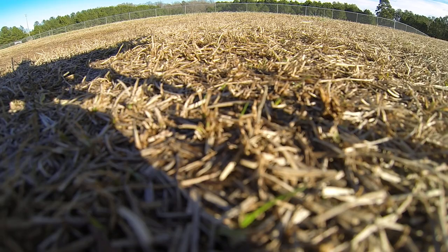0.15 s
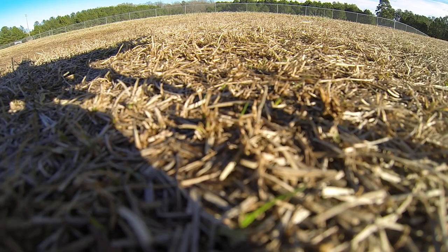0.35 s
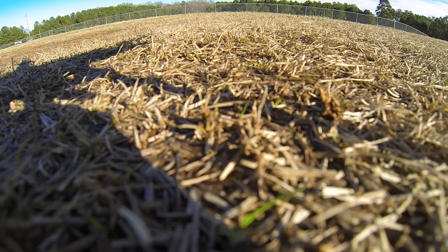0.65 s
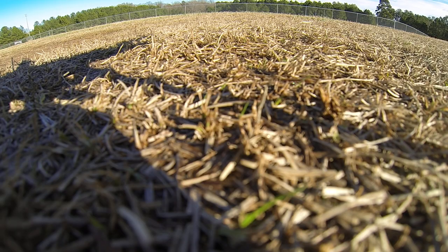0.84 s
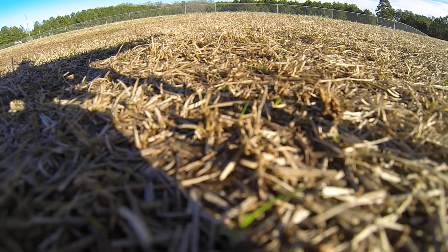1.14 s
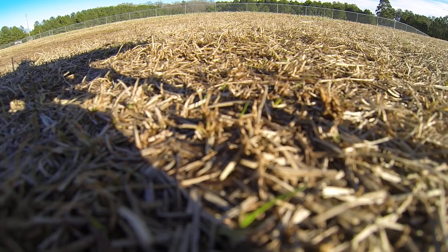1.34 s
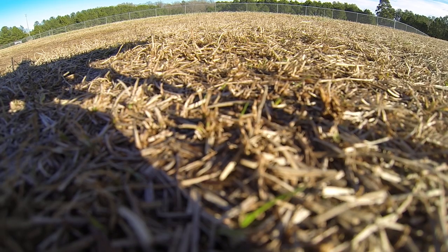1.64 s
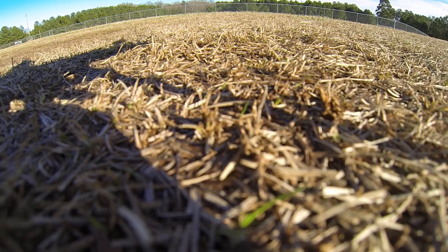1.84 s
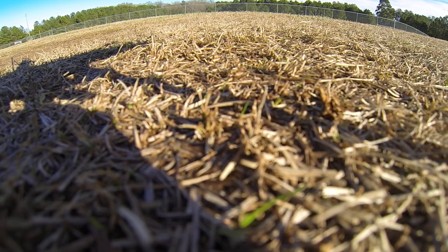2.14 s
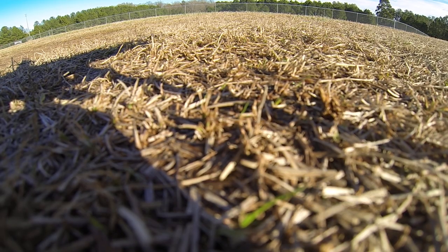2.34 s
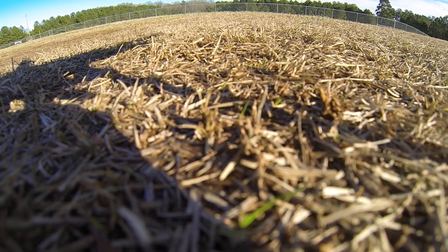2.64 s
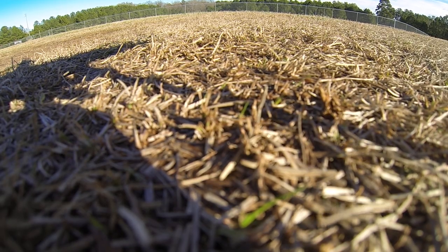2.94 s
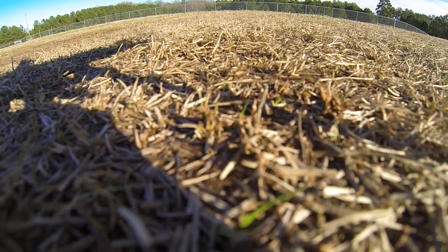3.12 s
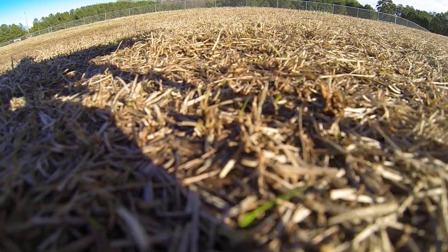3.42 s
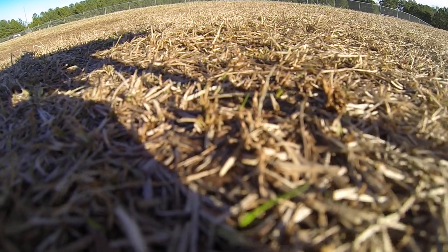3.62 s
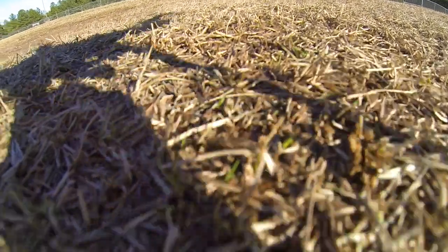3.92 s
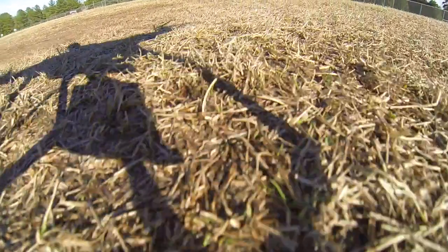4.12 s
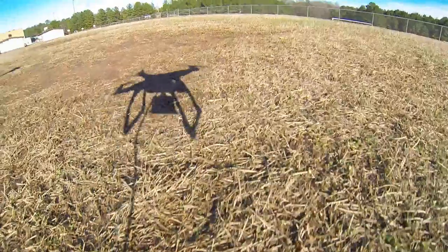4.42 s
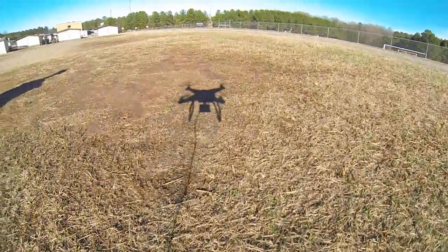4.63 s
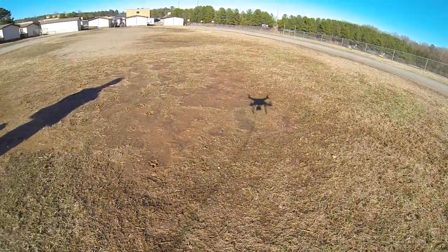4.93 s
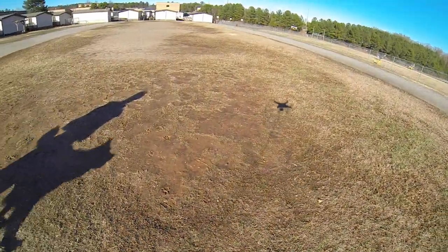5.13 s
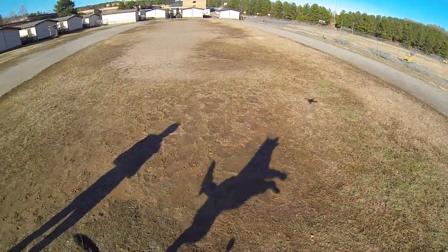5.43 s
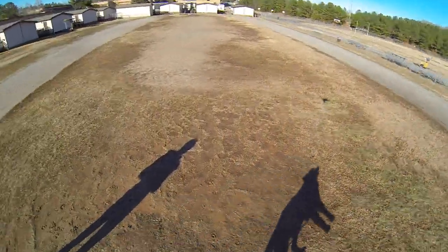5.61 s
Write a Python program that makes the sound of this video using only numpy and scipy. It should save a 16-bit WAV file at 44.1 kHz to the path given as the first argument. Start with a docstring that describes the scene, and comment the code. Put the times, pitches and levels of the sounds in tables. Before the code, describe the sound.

Outdoors over dry stubble, about a second of faint air and one tiny dry tick. A quadcopter then jolts awake with a growing rattle, settles into a whirring idle with a high electronic whine, and spins up. Wind wash roars and thuds against the microphone mounted on its frame, worst around lift-off, then eases into a loud, high propeller buzz as it climbs, with a bright click or two.

```python
"""Quiet open air over a stubble field with one faint dry tick; then a quadcopter close by jolts awake and rattles.
Its four motors idle briefly, spin up and lift it off, with the microphone riding on the frame at no distance.
Tones tied to each motor's turns make the propeller buzz and magnet hum, ringing through the frame's modes;
the speed controllers whine near 8 kHz. Coloured noise makes rasp, fizz, hiss and the wash that buffets the
microphone port, hardest around lift-off, then easing in the climb; the recorder's limiter ducks under it."""
import sys
import numpy as np
from scipy import signal
from scipy.fft import rfft, irfft, next_fast_len
from scipy.io import wavfile

SR = 44100
rng = np.random.default_rng(int(sys.argv[2]) if len(sys.argv) > 2 else 0)


def bounce(signal):
    """Save signal as a 16-bit WAV file at the path given by the first command-line argument."""
    frames = np.transpose(np.atleast_2d(signal))
    limited = np.clip(frames, -1, 1)
    pcm = np.round(limited * 32767).astype(np.int16)
    wavfile.write(sys.argv[1], SR, pcm)


N = 254280
T = np.arange(N) / SR  # seconds

# Open air: spectrum outlines, used for their shape only: pitch_hz, density_db (per Hz)
FIELD_SPECTRUM = [(20, 5.5), (60, 3.5), (150, -12), (300, -15.5), (800, -14), (1400, -20.5), (2500, -32),
                  (5000, -37.5), (15000, -47.5)]
TICK_SPECTRUM = [(300, 15), (1500, 7), (4000, -4), (7000, -24), (15000, -20)]
# Dry ticks, one faint before power-on, two bright clicks during the flight: start_s, peak_db
TICKS = [(0.521, -45.5), (4.558, -9), (5.591, -19)]
FIELD_DB, BREEZE_DB = -48, -51

# Propeller wash on the port, strongest around lift-off, then easing: time_s, level_db
WASH_LEVEL = [(1.1, -46.5), (1.45, -29), (2.05, -32), (2.2, -21.5), (2.33, -12.5), (2.55, -14.5),
              (3.0, -12), (3.45, -10), (3.6, -8), (3.85, -10), (3.97, -4), (4.24, -7), (4.35, -24),
              (4.41, -11), (4.52, -8.5), (4.6, -22), (4.72, -17.5), (5.77, -21)]
# Gusts that press on the port: start_s, peak_db
GUSTS = [(2.417, -7.5), (2.655, -5), (2.967, -9), (3.235, -4), (3.426, 3.5), (3.802, 8.5), (4.235, -2.5),
         (4.434, -4), (4.524, 4.5), (5.061, -0.5), (5.27, -21)]
# Strong eddies hitting the port: start_s, peak_db (relative), treble_db (relative to the peak)
EDDIES = [(2.324, -0.5, -19), (2.644, 7.5, -31), (2.69, 3, -12.5), (2.736, 2.5, -15), (2.774, 6.5, -35),
          (3.025, 8, -26), (3.231, 10, -34), (3.338, 8.5, -25), (3.507, -1, -27), (3.57, 8, -7.5),
          (3.633, -12, -26), (3.733, 8.5, -12.5), (3.797, 5.5, -11), (3.897, 13, -12.5), (3.961, 8, -7),
          (3.995, 6, -10), (4.042, 5.5, -4), (4.108, 10.5, -4), (4.144, -4, 7), (4.167, 6.5, -0.5),
          (4.433, 0.5, -4.5), (4.519, 3.5, -4)]
# Moving air, from deep to sharp: pitch_hz, density_db (per Hz)
RUMBLE_SPECTRUM = [(10, 5.5), (25, -7.5), (55, 3.5), (100, -3.5), (170, -12.5), (300, -37.5), (600, -43.5)]
FLUTTER_SPECTRUM = [(50, -7.5), (130, 3), (250, -1.5), (420, -7), (700, -15), (1200, -35), (2500, -58)]
TEARING_SPECTRUM = [(300, 3), (650, 3.5), (1000, 0.5), (1600, -5), (2600, -15.5), (4000, -20),
                    (8000, -42.5)]
CLEAR_OF_GROUND_S, CLEARING_S = 4.4, 0.31  # the wash stops bouncing back off the field

# Power-on, then the motors are stepped blindly until the controllers lock on
POWER_ON_S, STEPPING_S, LOCKED_S = 1.076, 1.1, 1.365
# Noise of the drone: pitch_hz, density_db (per Hz)
STUTTER_SPECTRUM = [(260, -46), (450, -12), (586, -15), (650, -12), (729, 1), (928, -36), (1360, -9),
                    (1500, -13.5), (1830, -13), (2270, -26.5), (3030, -13), (3430, -14.5), (3770, -29),
                    (4680, -23), (7000, -32), (9100, -69), (15400, -120)]
RASP_SPECTRUM = [(1290, -38), (2200, -53), (2470, -3), (2780, -2), (3220, 3.5), (3420, 1.5), (3820, -26),
                 (4320, -4.5), (4630, 7.5), (4870, 7.5), (5220, 2.5), (5480, -2), (7200, -18.5),
                 (9360, -44), (15800, -120)]
FIZZ_SPECTRUM = [(5500, -14), (7300, -5), (8100, 6), (9000, 6), (10500, -8), (13000, -14), (15000, -18)]
HISS_SPECTRUM = [(1200, 2), (2000, -5), (2500, -4), (3000, -10), (3700, -9.5), (4300, -4), (5100, -24),
                 (5800, -12.5), (7300, -14.5), (8100, -8), (9000, -16), (10500, -18), (15000, -23)]

# Start, idle, spin-up, climb: time_s, mean speed of the rotors (turns per s)
THROTTLE = [(1.12, 1), (1.33, 21.3), (1.4, 22.9), (1.6, 21.2), (2.07, 20.1), (2.15, 28.7), (2.27, 35.4),
            (2.55, 41.7), (4, 87.6), (4.4, 95.7), (4.8, 99.5), (4.9, 102.7), (5.04, 104), (5.3, 104.3),
            (5.37, 106.5), (5.52, 103.5), (5.62, 96), (5.77, 92)]
# Steering: time_s, speed of motors 1, 2, 3, 4 (share of the mean)
TRIM = [(1.4, 1.03, 1.013, .987, .974), (1.8, 1.087, 1.024, .976, .917), (2.35, 1.11, 1.014, .95, .93),
        (3, 1.063, 1.01, .977, .948), (3.7, 1.048, 1.016, .96, .97), (4.8, 1.035, 1.013, .992, .962),
        (5.04, 1.048, 1.033, 1.003, .925), (5.29, 1.037, 1.025, .988, .968), (5.5, 1.058, 1.035, .99, .89),
        (5.66, .98, .99, 1.09, .915)]
# Current drawn by the motors, low while they idle: time_s, effort_db
EFFORT = [(1.08, -2), (1.12, -7), (1.3, 1.5), (1.35, 1.5), (1.41, -7), (2.06, -7), (2.085, 4.5), (2.4, 7.5)]
FLIGHT_TURNS_PER_S, IDLE_TURNS_PER_S = 100, 20
# How each sound grows: flight_db (at flight speed, effort 0), growth_db (per tenfold speed), effort_share
BUZZ_LAW = (-19.5, 19.5, 0.055)
MAGNET_LAW = (-31, 0.5, 0.034)
STEP_LAW = (-24, 17.8, 0.27)
BELL_LAW = (-37, 17, .3)
WHINE_LAW = (-45, -20, 0.87)
BEAT_LAW = (-50.5, -2, 0.33)
RASP_LAW = (-45, -11.5, 1.08)
FIZZ_LAW = (-59.5, -16, 0.77)
HISS_LAW = (-38, 4.6, 0.98)
CHURN_LAW = (-37.5, 4.9, 0.12)

# Pressure wave of a propeller: multiple (of the turn rate), level_db
BLADES = [(2, -1), (4, -8), (6, -8.5), (8, -13), (10, -15.5), (12, -18.5), (16, -23.5), (24, -30.5),
          (44, -55)]
# Frame shaken by unbalanced propellers: time_s, level_db
SHAKE_LEVEL = [(1.08, -80), (2.1, -73), (4.6, -33), (4.95, -26), (5.12, -8), (5.35, -14), (5.48, -22.5),
               (5.77, -20.5)]
# Magnetic and cogging tones of a motor: multiple (of the turn rate), level_db
MAGNETS = [(14, -3.5), (24, -10), (28, -9), (36, -1), (42, 0), (44, -14.5), (48, -4.5), (54, -6.5),
           (66, -13), (72, -27), (112, -37), (126, -29), (168, -17)]
# Tones the motor bells radiate into the air: multiple (of the turn rate), level_db of motors 1, 2, 3, 4
BELLS = [(24, -12, -14, 7, -18), (42, -10, -14, 5.5, 1.5), (48, -17, -20, 1, -22)]
# How well the bells radiate: pitch_hz, level_db
BELL_COLOUR = [(1000, -6.5), (2250, -2), (2470, -1), (2700, -15), (3100, -3), (3750, -18), (4080, 0.5),
               (4500, -14), (4950, -7), (5500, -16)]
# Switching tones of the speed controllers: pitch_hz, level_db
CARRIERS = [(8089, 0), (8079, -5), (8045, -3), (8012, -3.5)]
# Current ripple beating with the switching tone: multiple (of the turn rate), level_db
BEATS = [(56, 8), (84, -1)]
# Resonances of the arms and shell: pitch_hz, width_hz, level_db
FRAME_MODES = [(677.4, 52, 12), (774.5, 27, 17.5), (970, 540, 1.5), (1396, 92, -5), (1694, 320, 1.5),
               (2446, 17, -1.5), (2950, 260, -3.5), (3317, 100, -1), (4176, 71, 1), (4640, 340, -19),
               (4654, 24, -5), (5200, 80, -2), (6620, 130, 2)]
BELL_STEPS_DB = -5  # current steps heard straight from the bells
COGGING_DB, COGGING_MODE_HZ, COGGING_WIDTH_HZ = -29, 760, 53  # lowest mode of an arm
STEPS_FADE_TURNS_PER_S = 43
WHINE_FADE_TURNS_PER_S = 95  # near full throttle the controllers hardly switch

LIMIT_DB, RELEASE_DB_PER_S, DETECTOR_S = -12, 65, 0.045  # the recorder's limiter
CUTOFF_HZ = 15300


def from_db(db):
    """Decibels to gain."""
    return 10 ** (np.asarray(db) / 20)


def rms_one(x):
    """Scale to unit power."""
    return x / np.sqrt(np.mean(x ** 2) + 1e-20)


def in_time(rows):
    """Each column of a curve at every sample."""
    s, *columns = np.transpose(rows)
    return [np.interp(T, s, c) for c in columns]


def at_level(x, curve):
    """Play a steady sound along a level curve."""
    return rms_one(x) * from_db(in_time(curve)[0])


def colour(x, spectrum):
    """Filter by a spectrum outline that falls away steeply above its last point."""
    hz, db = np.transpose(spectrum)
    size = next_fast_len(N + SR // 4)
    bins = np.maximum(np.arange(size // 2 + 1) * SR / size, 1)
    outline = from_db(np.interp(np.log(bins), np.log(hz), db))
    gain = outline * np.minimum(1, hz[-1] / bins) ** 2
    return irfft(rfft(x, size) * gain, size)[:N]


def noise(spectrum):
    """Coloured noise of unit power."""
    return rms_one(colour(rng.standard_normal(N), spectrum))


def crackle(spectrum, per_s=700):
    """Sharp pressure spikes of uneven size over a little smooth noise; unit power."""
    spikes = (rng.random(N) < per_s / SR) * np.clip(rng.standard_normal(N), -2, 2)
    return rms_one(colour(spikes + 0.05 * rng.standard_normal(N), spectrum))


def drift(rate):
    """Slow random wandering of spread 1, from noise smoothed by two poles at rate (Hz)."""
    step = 40  # samples between the slow values
    r = np.exp(-2 * np.pi * rate * step / SR)
    draws = rng.standard_normal(N // step + 2002)
    slow = signal.lfilter([1], [1, -2 * r, r * r], draws)[2000:]  # settled part
    return np.interp(np.arange(N) / step, np.arange(len(slow)), rms_one(slow))


def waver(rate, depth_db):
    """A randomly wandering gain of unit power."""
    return rms_one(from_db(depth_db * np.clip(drift(rate), -2, 2)))


def smooth(x, seconds):
    """One-pole average."""
    r = np.exp(-1 / (seconds * SR))
    return signal.lfilter([1 - r], [1, -r], x)


def resonance(x, hz, width_hz):
    """One mode, with gain 1 at its top."""
    r = np.exp(-np.pi * width_hz / SR)
    top = np.array([1, 0, -1]) * (1 - r * r) / 2
    return signal.lfilter(top, [1, -2 * r * np.cos(2 * np.pi * hz / SR), r * r], x)


def follow(law):
    """Gain of a drone sound, from speed and effort."""
    flight_db, growth_db, effort_share = law
    speed = np.maximum(in_time(THROTTLE)[0], IDLE_TURNS_PER_S)
    speed_db = growth_db * np.log10(speed / FLIGHT_TURNS_PER_S)
    return from_db(flight_db + speed_db + effort_share * in_time(EFFORT)[0])


def fade_above(speed, corner, order=6):
    """Gain that falls away once the speed passes a corner."""
    return 1 / np.sqrt(1 + (speed / corner) ** (2 * order))


def start_up():
    """Gain that rises with the square of the speed up to idle."""
    return np.minimum(in_time(THROTTLE)[0] / IDLE_TURNS_PER_S, 1) ** 2


def field(tick_decay_s=0.0046):
    """Quiet open air, a light breeze on the port and three dry, fast-dying ticks."""
    ticks = sum(from_db(db) * (T > s) * np.exp(-np.abs(T - s) / tick_decay_s) for s, db in TICKS)
    breeze = from_db(BREEZE_DB) * noise(RUMBLE_SPECTRUM) * waver(rate=12, depth_db=-1.5)
    air = from_db(FIELD_DB) * noise(FIELD_SPECTRUM) * waver(rate=3.1, depth_db=1.5)
    return air + breeze + ticks * noise(TICK_SPECTRUM)


def wash(flutter_db=-0.5, flutter_growth=1.07, tearing_db=-4, tearing_growth=1.776, airborne_db=-5):
    """Turbulent air on the port: brighter and lumpier the harder it blows, less fluttery off the ground."""
    level_db, = in_time(WASH_LEVEL)
    airborne = np.clip((T - CLEAR_OF_GROUND_S) / CLEARING_S, 0, 1)
    lumps = waver(rate=82, depth_db=2.5)
    rumble = from_db(level_db) * noise(RUMBLE_SPECTRUM) * waver(rate=21, depth_db=1.4)
    flutter_level_db = flutter_growth * level_db + flutter_db + airborne_db * airborne
    flutter = from_db(flutter_level_db) * noise(FLUTTER_SPECTRUM)
    tearing = from_db(tearing_growth * level_db + tearing_db) * crackle(TEARING_SPECTRUM)
    return rumble + lumps * (flutter + tearing)


def gusts(rise_s=0.0096, rough=0.36):
    """Each gust is one slow, slightly ragged push of pressure on the port."""
    push = 0
    for s, peak_db in GUSTS:
        age = np.clip((T - s) / rise_s, 0, 40)
        push = push + from_db(peak_db) * age * np.exp(1 - age)
    return push * (1 + rough * noise(RUMBLE_SPECTRUM))


def eddies(rise_s=0.0024, thud_db=-9, tear_db=-8):
    """Each eddy is a short dull thud with a tearing edge."""
    thud, tear = np.zeros(N), np.zeros(N)
    age = np.arange(SR // 16) / SR / rise_s
    puff = age * np.exp(1 - age)
    for s, peak_db, treble_db in EDDIES:
        start = round(s * SR)
        at = slice(start, start + len(puff))
        thud[at] += from_db(peak_db + thud_db) * puff
        tear[at] += from_db(peak_db + treble_db + tear_db) * puff
    return thud * noise(FLUTTER_SPECTRUM) + tear * noise(TEARING_SPECTRUM)


def stutter(kicks_per_s=1100, ring_hz=738, ring_width_hz=40):
    """A power-on jolt, then growing irregular current kicks set the frame ringing until lock-on."""
    jolt_db, jolt_s = -30, 0.017
    stepping_db, growth_db_per_s, release_s = -31, 20, 0.0061
    jolt = from_db(jolt_db) * (T > POWER_ON_S) * np.exp(-np.abs(T - POWER_ON_S) / jolt_s)
    early, late = np.maximum(LOCKED_S - T, 0), np.maximum(T - LOCKED_S, 0)
    growth = from_db(stepping_db - growth_db_per_s * early)
    stepping = (T > STEPPING_S) * growth * np.exp(-late / release_s)
    kicks = (rng.random(N) < kicks_per_s / SR) * rng.standard_normal(N)
    rattle = rms_one(colour(kicks + 0.2 * rng.standard_normal(N), STUTTER_SPECTRUM))
    ring = rms_one(resonance(kicks, ring_hz, ring_width_hz))
    return (jolt + stepping) * (rattle + ring)


def rush():
    """The motors rasp in the frame, the controllers fizz, the blade tips hiss and churn the air."""
    rasp = follow(RASP_LAW) * noise(RASP_SPECTRUM) * waver(rate=38, depth_db=1.5)
    fizz = follow(FIZZ_LAW) * noise(FIZZ_SPECTRUM)
    hiss = follow(HISS_LAW) * noise(HISS_SPECTRUM) * waver(rate=190, depth_db=2.2)
    churn = follow(CHURN_LAW) * crackle(TEARING_SPECTRUM) * start_up()
    return (T > STEPPING_S) * (rasp + fizz + hiss + churn)


def per_turn(turns, orders, levels_db, size=8192):
    """A wave of unit power that repeats on every turn, made of the given multiples."""
    angle = np.arange(size + 1) / size
    phases = rng.random((len(orders), 1))
    partials = np.sin(2 * np.pi * (np.outer(np.round(orders), angle) + phases))
    shape = from_db(levels_db) @ partials
    return np.interp(turns % 1, angle, rms_one(shape))


def propeller(turns, odd_db=-15, count=44, sway_turns=0.006):
    """Two blades give even multiples, their mismatch weak odd ones; torn air varies each passage."""
    orders = np.arange(2, count)
    levels_db = np.interp(orders, *np.transpose(BLADES)) + odd_db * (orders % 2)
    sway = sway_turns * drift(35)
    return per_turn(turns + sway, orders, levels_db) * waver(rate=9.6, depth_db=4.0)


def motor(turns, comb_db=-9, count=130):
    """Magnets passing the stator give strong high multiples over a weak comb of the even ones."""
    magnets = per_turn(turns, *np.transpose(MAGNETS))
    orders = 2 * np.arange(16, count)
    uneven = per_turn(turns, orders, rng.normal(0, 4.3, len(orders)))
    return (magnets + from_db(comb_db) * uneven) * waver(rate=3, depth_db=4.0)


def bell(turns, levels_db):
    """One motor's outer bell radiates a few multiples of its turn rate straight into the air."""
    orders = np.round(np.transpose(BELLS)[0])
    tones = from_db(levels_db) @ np.sin(2 * np.pi * np.outer(orders, turns))
    return tones * waver(rate=5, depth_db=3)


def ripple(turns, carrier_hz):
    """Current ripple beats with the switching tone, giving tones that fall as the motor speeds up."""
    return sum(from_db(db) * np.sin(2 * np.pi * (carrier_hz * T - round(order) * turns))
               for order, db in BEATS)


def controller(turns, carrier_hz, sideband_db=-15, second_db=-32, skirt_db=-21):
    """The switching tone; 14 passing poles put side tones on it that fan out with speed."""
    poles = 2 * np.pi * 14 * turns
    sidebands = from_db(sideband_db) * np.cos(poles) + from_db(second_db) * np.cos(2 * poles)
    skirt = from_db(skirt_db) * drift(430)
    carrier = np.sin(2 * np.pi * (carrier_hz * T + rng.random()))
    return (1 + 2 * sidebands + 2 * skirt) * carrier


def frame(x):
    """Tones flare up as they glide through the modes of the frame, and all but vanish between them."""
    return sum(from_db(db) * resonance(resonance(x, hz, width), hz, width)
               for hz, width, db in FRAME_MODES)


def rotors():
    """Four motors at slightly different speeds beat against each other, through air and frame."""
    through_air, through_arm = from_db([7, 1, -1, 1.5]), from_db([-1, -3, 2.5, -2])
    throttle, = in_time(THROTTLE)
    bell_levels = np.transpose(BELLS)[1:]
    buzz = hum = cogging = steps = bells = beats = whine = shake = 0
    motors = zip(in_time(TRIM), CARRIERS, through_air, through_arm, bell_levels)
    for trim, (carrier_hz, carrier_db), air, arm, bell_db in motors:
        speed = throttle * trim
        turns = np.cumsum(speed * (1 + 0.0016 * drift(12))) / SR
        buzz = buzz + air * propeller(turns)
        shake = shake + air * np.sin(2 * np.pi * turns) * waver(rate=16, depth_db=4)
        hum = hum + arm * motor(turns)
        cogging = cogging + arm * np.sin(2 * np.pi * 36 * turns)
        # current steps, 84 a turn, smoothed out at speed
        step_tone = np.sin(2 * np.pi * 84 * turns)
        steps = steps + arm * step_tone * fade_above(speed, STEPS_FADE_TURNS_PER_S, order=12)
        bells = bells + bell(turns, bell_db)
        beats = beats + ripple(turns, carrier_hz)
        whine = whine + from_db(carrier_db) * controller(turns, carrier_hz)
    buzz = rms_one(buzz) * follow(BUZZ_LAW)
    steps = steps / np.sqrt(2) * follow(STEP_LAW)
    whine = rms_one(whine) * follow(WHINE_LAW) * fade_above(throttle, WHINE_FADE_TURNS_PER_S)
    bells = colour(rms_one(bells), BELL_COLOUR) * follow(BELL_LAW)
    radiated = from_db(BELL_STEPS_DB) * steps + bells
    hum = rms_one(hum) * follow(MAGNET_LAW)
    beats = rms_one(beats) * follow(BEAT_LAW)
    vibration = frame(hum + beats + steps)
    # around idle speed the cogging sweeps through the arm's mode
    arms = from_db(COGGING_DB) * resonance(rms_one(cogging), COGGING_MODE_HZ, COGGING_WIDTH_HZ)
    return start_up() * (buzz + vibration + arms + radiated) + at_level(shake, SHAKE_LEVEL) + whine


def scene():
    """The field, the air on the port, and the drone that comes alive at once when armed."""
    powered = np.clip((T - POWER_ON_S) / 0.00045, 0, 1)
    surroundings = field() + wash() + gusts() + eddies()
    drone = stutter() + powered * (rush() + rotors())
    return (surroundings + drone)[None]


def limiter(x, attack_s=0.0067):
    """Turns everything down when the sound gets too loud, and recovers at a steady rate."""
    level_db = 10 * np.log10(smooth(x ** 2, DETECTOR_S) + 1e-12)
    over_db = np.maximum(level_db - LIMIT_DB, 0)
    recovery_db = RELEASE_DB_PER_S * T
    held_db = np.maximum.accumulate(over_db + recovery_db) - recovery_db
    return x * from_db(-smooth(held_db, attack_s))


def record(dry):
    """The limiter ducks under the wind, the deepest rumble is shed, peaks are rounded, the top is cut."""
    low_cut = signal.butter(2, 14, "high", fs=SR, output="sos")
    lean = signal.sosfilt(low_cut, limiter(dry))
    rounded = 1.042 * np.tanh(lean / 1.183)
    top_cut = signal.ellip(12, 0.1, 90, CUTOFF_HZ, fs=SR, output="sos")
    return signal.sosfilt(top_cut, rounded)


dry = scene()
out = record(dry)
bounce(out)
```